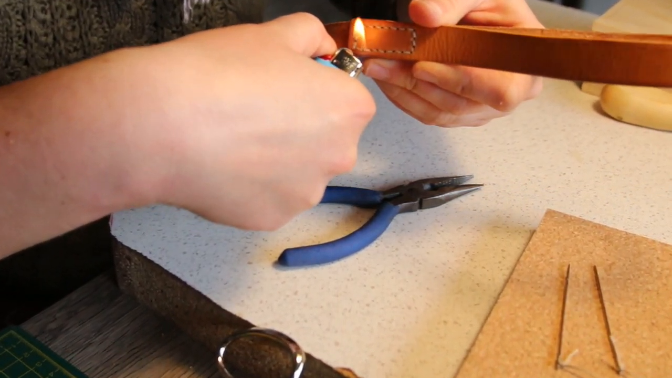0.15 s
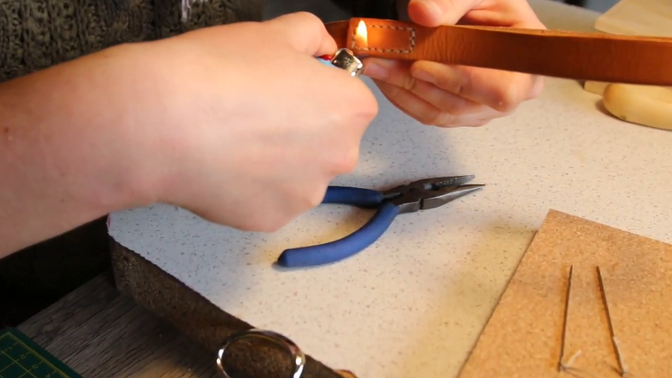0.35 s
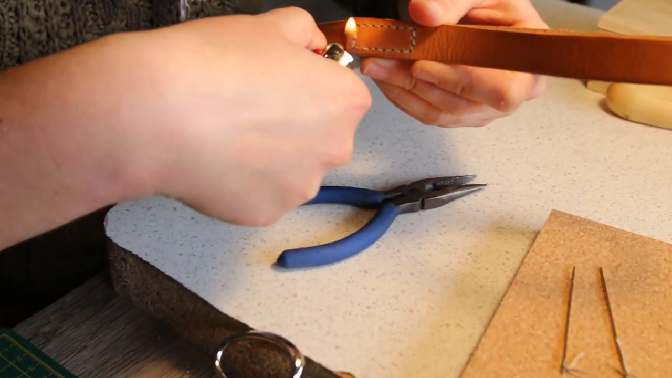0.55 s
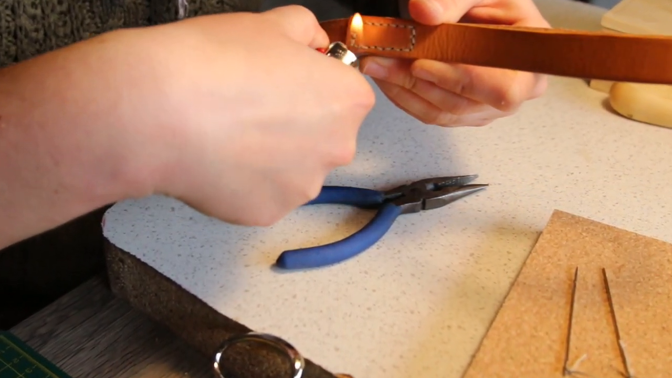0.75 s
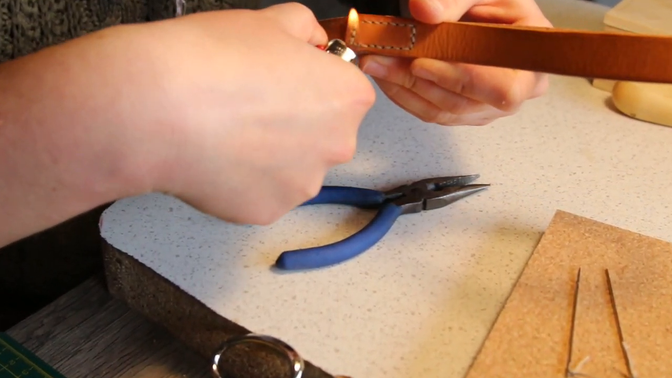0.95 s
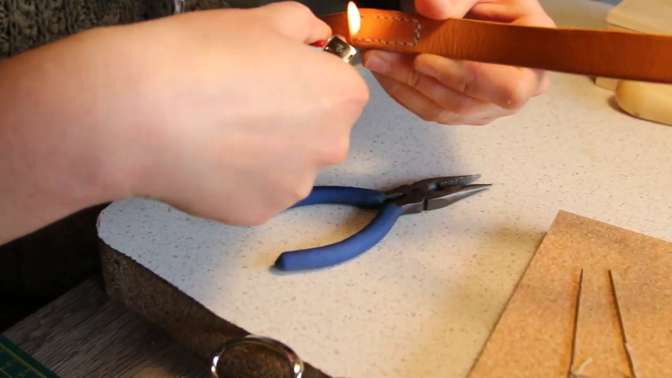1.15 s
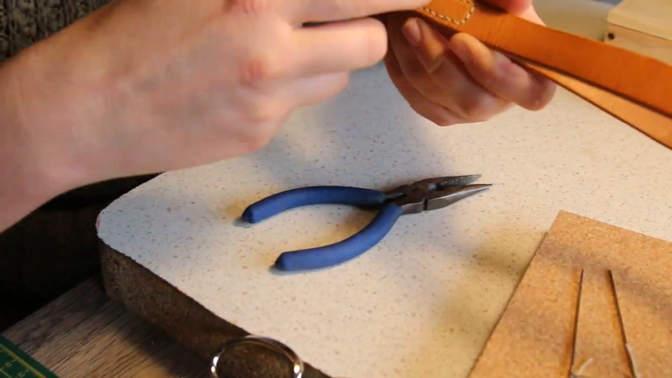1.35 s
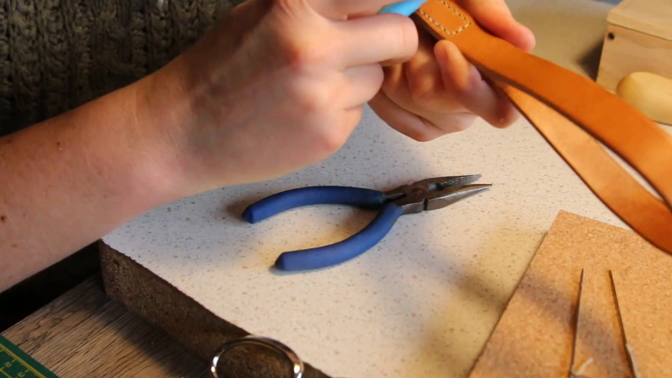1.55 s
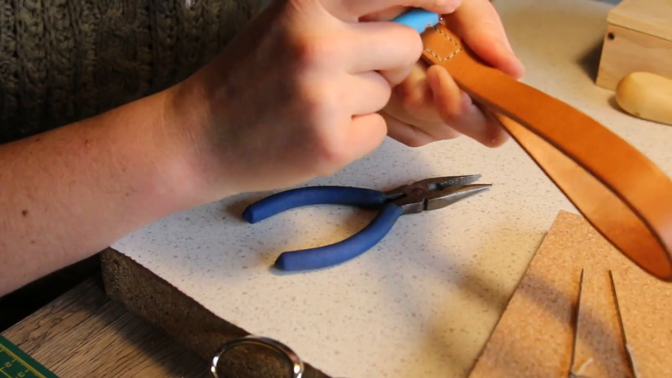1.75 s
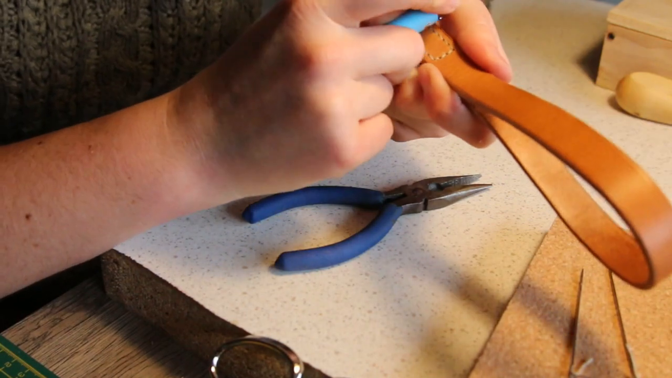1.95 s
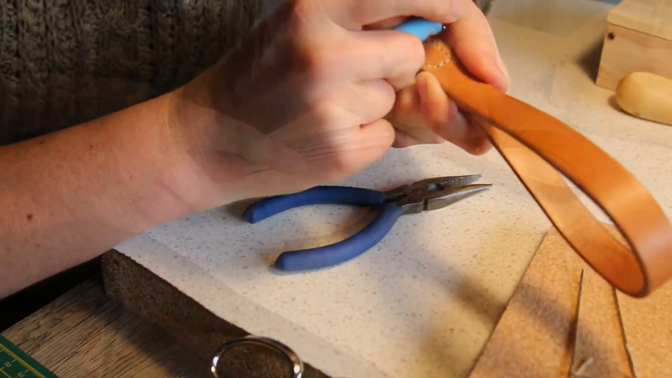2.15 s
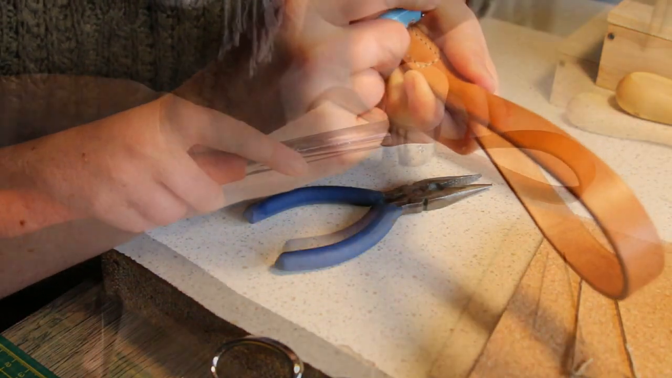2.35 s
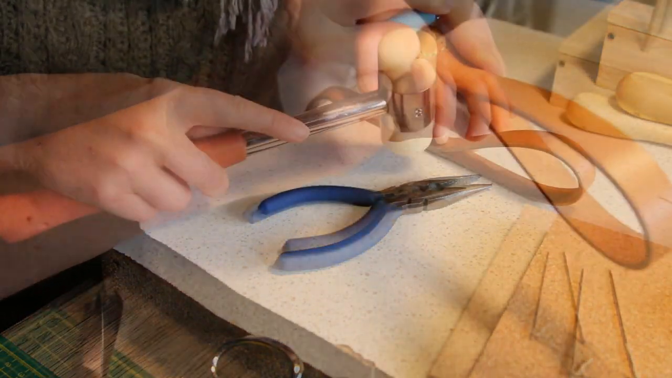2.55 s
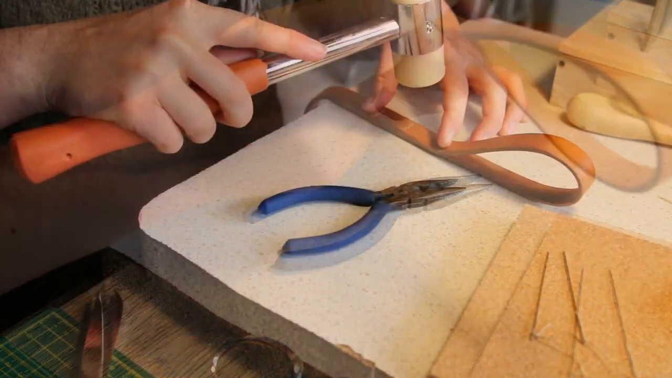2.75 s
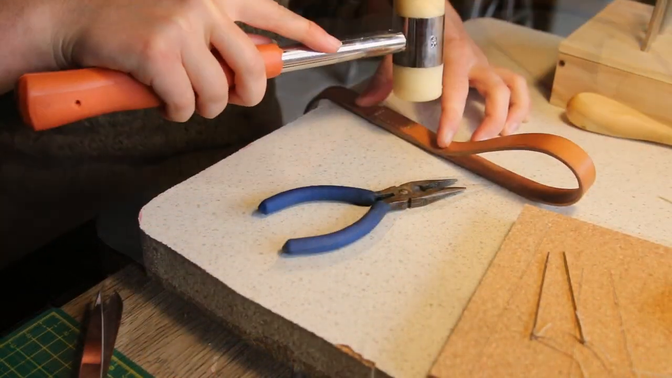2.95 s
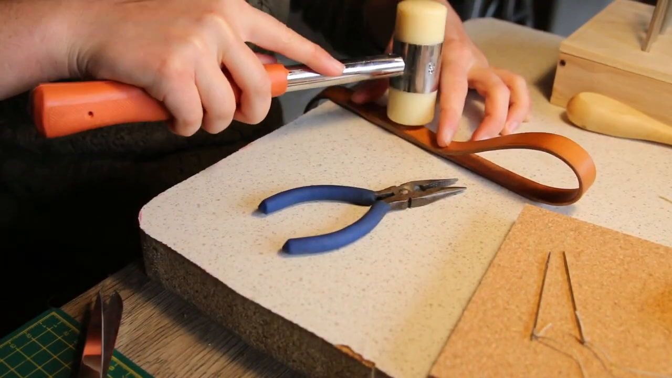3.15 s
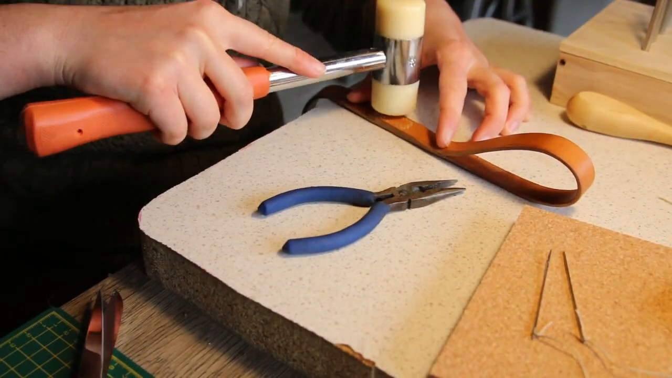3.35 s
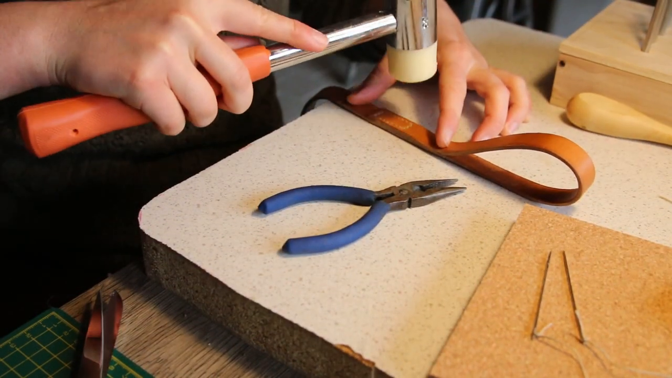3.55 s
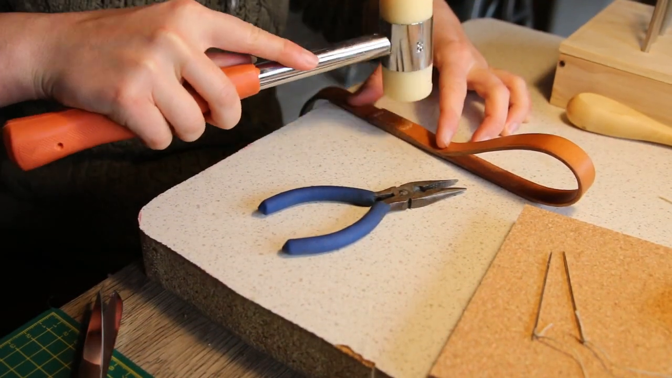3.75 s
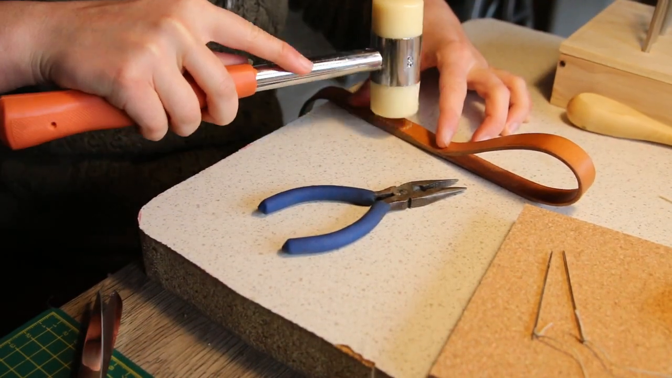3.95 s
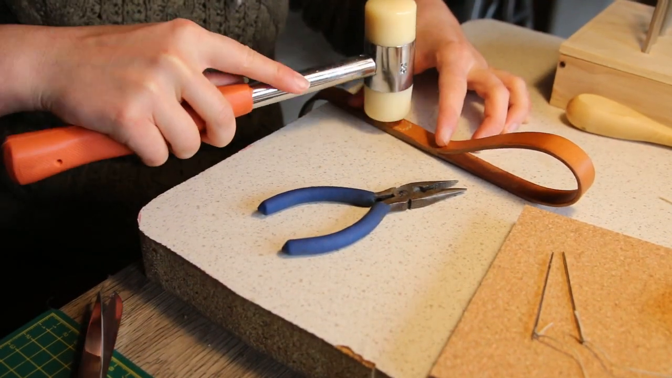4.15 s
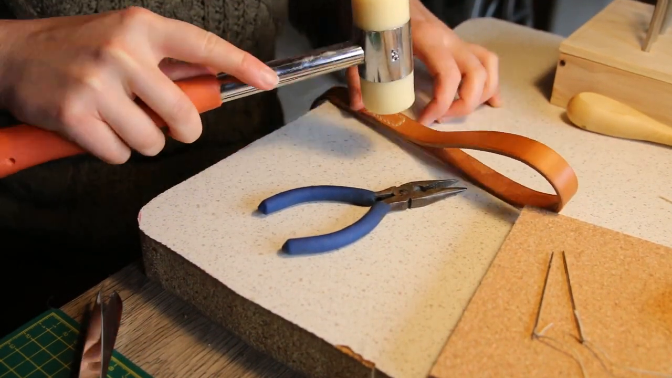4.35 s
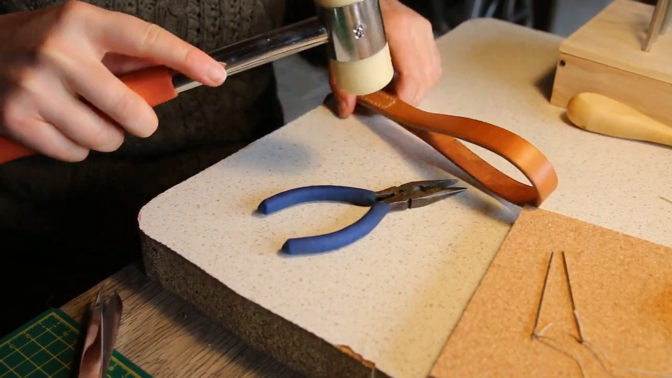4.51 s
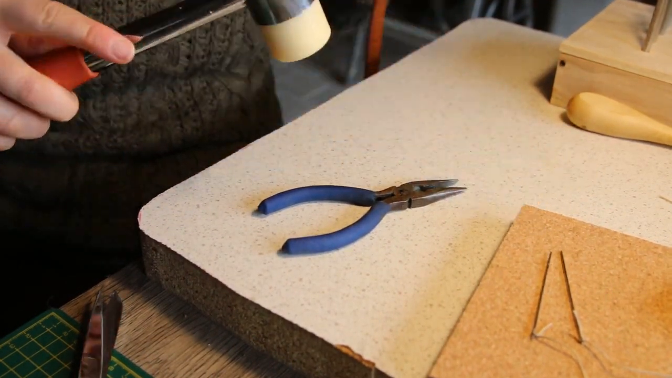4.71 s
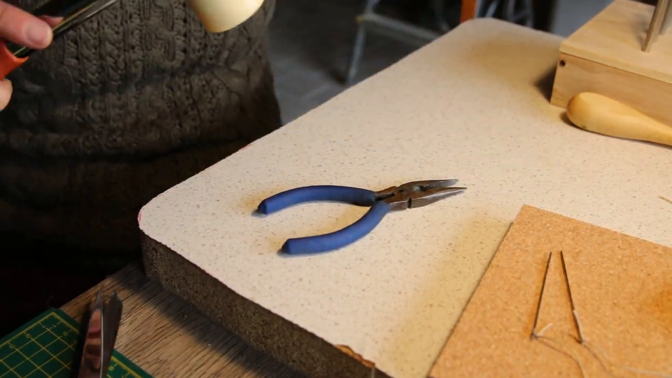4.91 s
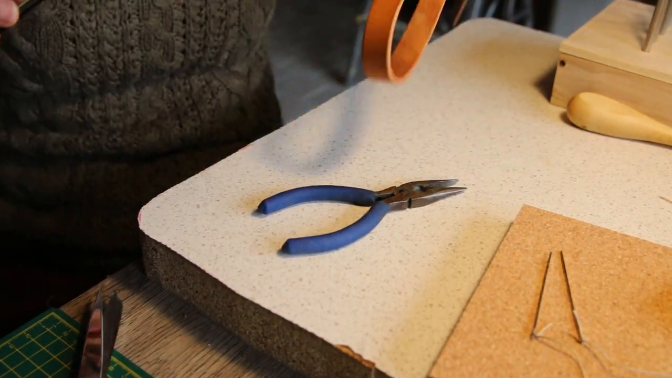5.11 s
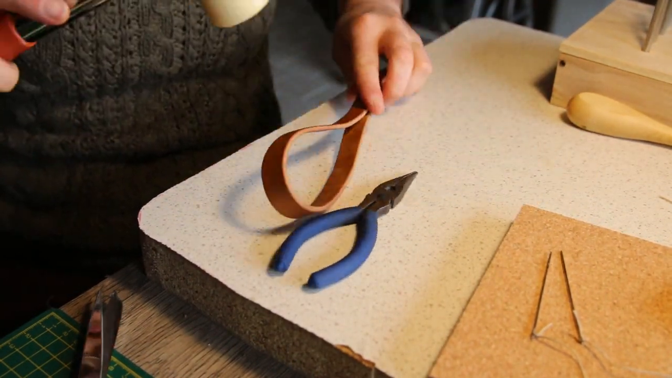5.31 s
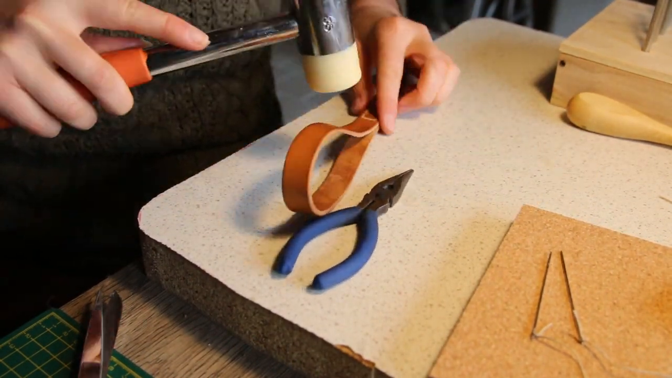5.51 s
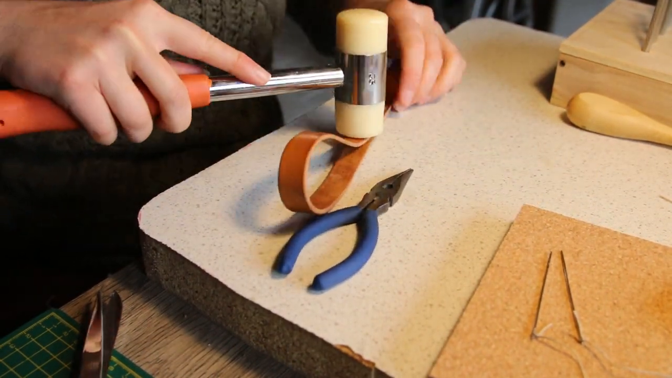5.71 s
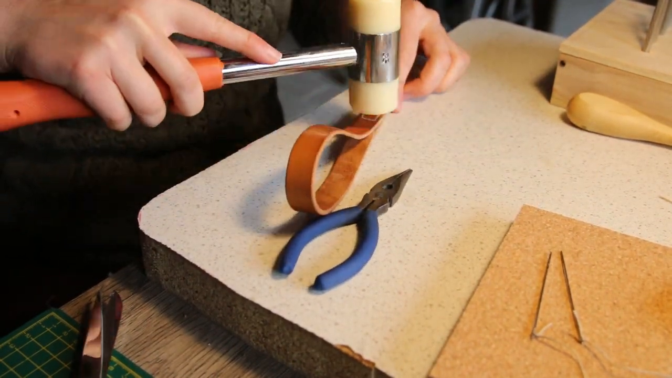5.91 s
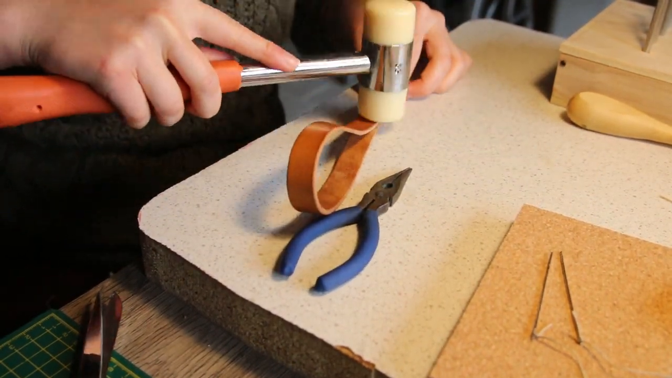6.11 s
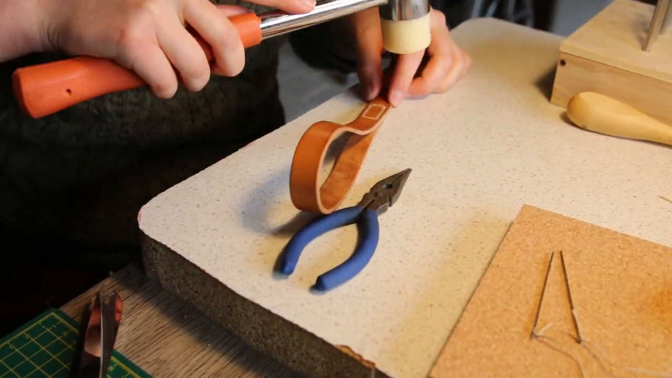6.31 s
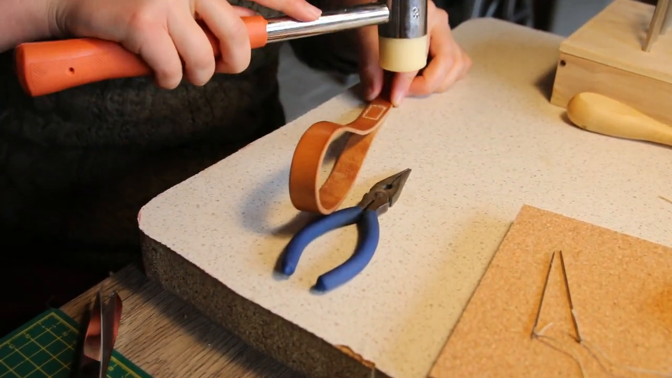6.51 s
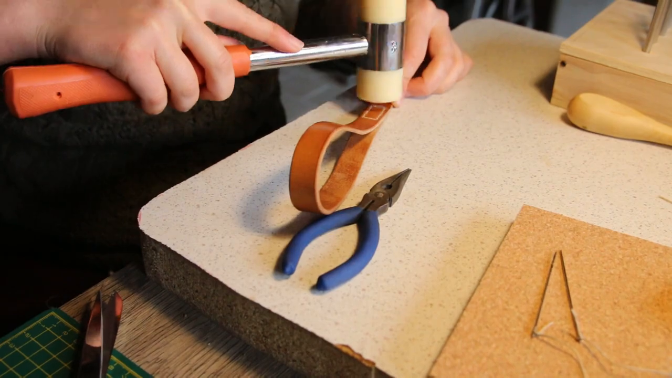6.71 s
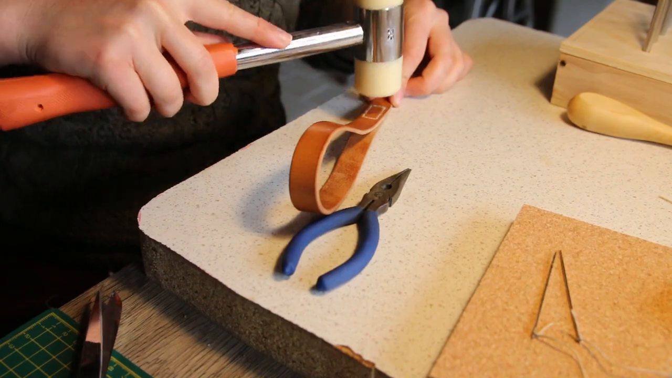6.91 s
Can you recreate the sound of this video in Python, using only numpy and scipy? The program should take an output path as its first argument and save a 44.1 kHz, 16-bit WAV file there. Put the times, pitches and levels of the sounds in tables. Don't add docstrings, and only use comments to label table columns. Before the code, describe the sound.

A small, fairly live workshop heard close up in stereo. At first there is only soft hiss and faint distant vehicle rumble. Around 1.2 s a lighter clicks lightly, followed by leather rubbing and dull little knocks to 1.5 s; more tiny clicks come at 2.25 s. The hiss fades lower by 3 s, with a light bench knock at 2.8. A slightly softer mallet blow lands at 2.9, then five firm ones about every quarter second until 4.2: short, hard knocks on leather over stone, loose tools rattling, a faint hum lingering. Quiet sleeve rustles follow. At 5.2-5.4 the strap slaps, flops and clacks against pliers. A lower, cushioned thump at 5.8 precedes hard blows at 6.2, 6.5 and 6.75. Every blow is slightly clipped and ducked, the room swelling up behind it.

```python
import sys
import numpy as np
from scipy import signal
from scipy.fft import rfft, irfft
from scipy.io import wavfile
from scipy.ndimage import uniform_filter1d

SR = 44100
rng = np.random.default_rng(int(sys.argv[2]) if len(sys.argv) > 2 else 0)


def unload_audio(sound):
    columns = np.transpose(np.atleast_2d(sound))
    steps = np.round(np.clip(columns, -1, 1) * 32767)
    wavfile.write(sys.argv[1], SR, steps.astype(np.int16))


def level_to_linear(level):
    exponent = np.asarray(level, float) / 20
    return 10 ** exponent


N = 307377
TAIL = 2 * SR // 3

# start in seconds, room answer in dB, hardness as a pitch factor of the block.
BLOWS = [
    (2.9286, -4.5, .91),
    (3.1835, 0, 1),
    (3.4347, 0, 1),
    (3.6962, 0, 1),
    (3.9491, 0, 1),
    (4.2102, 0, 1),
    (6.1844, 0, 1),
    (6.4812, 0, 1),
    (6.7601, 0, 1),
]
# start in seconds, strength in dB, room answer in dB, hardness as a pitch factor.
CUSHIONED_BLOW = (5.8003, -2, -8.5, 1)
# frequency in Hz, side minus mid in dB.
HISS_WIDTH = [(60, -8), (110, -4.5), (200, -1), (380, -0.5), (700, -2.5), (1290, 0), (2380, 0.5),
              (4400, -0.5), (8120, 0), (15000, 1)]
# frequency in Hz, side minus mid in dB.
ROOM_WIDTH = [(60, -17), (110, -32), (200, -21.5), (380, -21), (700, -15.5), (1290, -8), (2380, -6.5),
              (4400, 4), (8120, 1), (15000, 5)]


def unit(x):
    return x / np.sqrt(np.mean(x ** 2) + 1e-20)


def along(points, hz):
    f, v = np.transpose(points)
    return np.interp(np.log(hz + 1), np.log(f + 1), v)


def bump(hz, centre_hz, width_hz):
    detuning = (hz * hz - centre_hz ** 2) / (width_hz * (hz + 1))
    return 1 / np.sqrt(1 + detuning ** 2)


def noise(size, gain, side):
    hz = np.fft.rfftfreq(size, 1 / SR)
    turn = np.arctan(level_to_linear(along(side, hz)))
    spectra = rfft(rng.standard_normal((2, size))) * gain(hz)
    mid, diff = irfft(spectra * [np.cos(turn), np.sin(turn)], size)
    left = np.roll(mid + diff, 2)
    return unit(np.array([left, mid - diff]))


def dying(x, build_s, patchy_db=1.26):
    # frequency in Hz, time to fall 60 dB in seconds.
    room_t60 = [(60, 0.56), (200, 0.4), (1000, 0.57), (4000, 0.54), (8000, 0.43), (15000, 0.25)]
    hz, t, z = signal.stft(x, SR, nperseg=256)
    patch = rng.standard_normal(z.shape[1:])
    patch = uniform_filter1d(patch, size=4, axis=0)
    patch = unit(uniform_filter1d(patch, size=6, axis=1))
    fall_db = 60 * t / along(room_t60, hz)[:, None]
    tail = signal.istft(z * level_to_linear(patchy_db * patch - fall_db), SR, nperseg=256)[1][:, :TAIL]
    return tail * (1 - np.exp(-np.arange(TAIL) / SR / build_s))


def add(out, s, x):
    out[:, round(s * SR):][:, :x.shape[-1]] += x


def apart(x, count=3):
    return np.array([np.roll(x, count), x])


def hiss():
    # frequency in Hz, level in dB per Hz.
    first_colour = [(15, -44.5), (25, -13), (43, -25), (64, -8), (82, -11), (117, -7), (217, -7.5),
                    (242, -6), (373, -7.5), (531, -10.5), (695, -10.5), (9570, -18.5), (16000, -22.5)]
    # frequency in Hz, level in dB per Hz.
    second_colour = [(15, -56), (25, -36), (166, -10), (405, -21), (451, -6.5), (545, -19), (607, -14),
                     (1230, -18), (1700, -24), (8360, -25.5), (16000, -30)]
    fade_from_s, fade_to_s = 2.3, 3.02
    t = np.arange(N) / SR
    fade = np.clip((fade_to_s - t) / (fade_to_s - fade_from_s), 0, 1)
    first = level_to_linear(-59) * fade * noise(N, lambda hz: level_to_linear(along(first_colour, hz)), HISS_WIDTH)
    second = level_to_linear(-75.0) * noise(N, lambda hz: level_to_linear(along(second_colour, hz)), HISS_WIDTH)
    return first + second


def rumble():
    # nearest moment in seconds, level in dB, passing time in seconds.
    vehicles = [
        (.3, -67, 0.23),
        (.8, -69, 0.18),
        (1.3, -70, 0.19),
    ]
    shudder_db, shudder_t60 = -55, 0.68
    t = np.arange(N) / SR
    low = sum(level_to_linear(db) * np.exp(-((t - s) / pass_s) ** 2) for s, db, pass_s in vehicles)
    for s, *_ in BLOWS + [CUSHIONED_BLOW]:
        low += (t > s) * level_to_linear(shudder_db - 60 * np.abs(t - s) / shudder_t60)
    return level_to_linear(-2.5) * low * noise(N, lambda hz: bump(hz, 80, 21) ** 2, HISS_WIDTH)


def ticks(table, width, t60, thud_db, fizz_db):
    out, t = np.zeros((2, N + TAIL)), np.arange(TAIL) / SR
    echo_s = .003
    rise = 1 - np.exp(-t / .0003)
    for s, db, ring_hz, room_db in table:
        def colour(hz):
            ring = bump(hz, ring_hz, width * ring_hz) ** 2
            thud = bump(hz, 180, 500) ** 3 * hz ** 2 / (hz ** 2 + 130 ** 2)
            fizz = bump(hz, 7900, 3600) ** 2
            return ring + level_to_linear(thud_db + 24) * thud + level_to_linear(fizz_db + 4.0) * fizz

        touch = noise(TAIL, colour, ROOM_WIDTH)
        ringing = touch[0] + 0.7 * np.sin(2 * np.pi * ring_hz * t)
        direct = rise * level_to_linear(-60 * t / t60) * ringing
        direct *= level_to_linear(4) / np.abs(direct).max()
        size = np.sqrt(1 + level_to_linear(2 * thud_db))
        add(out, s, level_to_linear(db) * size * apart(direct, count=1))
        answer = dying(touch[:, ::-1], build_s=0.0013)
        add(out, s + echo_s, level_to_linear(db + room_db - 14) * size * answer)
    return out[:, :N]


def handling():
    # start in seconds, peak in dB, ring in Hz, room in dB.
    lighter = [(1.2146, -48, 3370, -4), (1.2274, -49, 3280, -5), (1.2775, -44, 3470, -2.5),
               (2.2498, -47.5, 3640, -10), (2.2505, -50.5, 2250, -2), (2.2644, -52, 2200, -10)]
    # seconds, dB, Hz, dB.
    snaps = [(1.3558, -56, 6340, -11), (1.4067, -52, 6500, -14), (2.9356, -33.5, 6200, -29),
             (5.2451, -39.5, 3150, -14), (5.2525, -56, 6000, -10), (5.2865, -35, 12000, -17),
             (5.2881, -44, 7560, -6), (5.3378, -51, 8400, -7), (5.3594, -53, 9000, -10),
             (5.4071, -59, 4830, -21), (5.8072, -42, 6200, -25), (5.8124, -49, 4530, -22)]
    # seconds, dB, Hz, dB.
    slaps = [(1.4185, -40.5, 2310, 6.5), (5.2094, -38.5, 2940, 1)]
    # seconds, dB, Hz, dB.
    knocks = [(1.42, -40.5, 610, 3), (1.4345, -40.5, 810, 6), (1.446, -43, 607, -16), (1.502, -53, 860, 2),
              (4.298, -24.5, 574, 5), (5.285, -50.5, 980, 8.5)]
    # seconds, dB, Hz, dB.
    grazes = [(2.9283, -33, 2520, -20), (5.7795, -62.5, 2600, 10), (5.804, -41, 1950, -14),
              (6.1818, -38, 2550, -20), (6.9, -47, 2440, -22)]
    # seconds, dB, Hz, dB.
    flops = [(5.221, -45.5, 870, 2), (5.245, -38.5, 1130, 2), (5.701, -50.5, 624, 7.5)]
    # seconds, dB, Hz, dB.
    clack = [
        (5.4072, -38.5, 2500, 0.99),
    ]
    return (ticks(lighter, width=.2, t60=.016, thud_db=-40, fizz_db=-17)
            + ticks(snaps, width=.7, t60=.009, thud_db=-40, fizz_db=-10)
            + ticks(slaps, width=.8, t60=.011, thud_db=-14, fizz_db=-36)
            + ticks(knocks, width=1.0, t60=0.022, thud_db=-32, fizz_db=-34.5)
            + ticks(grazes, width=1.0, t60=0.038, thud_db=-37, fizz_db=-30)
            + ticks(flops, width=0.49, t60=0.026, thud_db=-14.0, fizz_db=-32)
            + ticks(clack, width=.78, t60=.012, thud_db=-25, fizz_db=-38))


def rubbing():
    # arrival in seconds, body in dB, fizz in dB, approach in seconds, hold in seconds.
    strokes = [(1.352, -50.5, -64, .2, 0.034), (1.427, -50.5, -72, .04, 0.022),
               (2.233, -62, -61, .05, 0.024), (4.578, -65, -79, .05, .03), (4.656, -62, -71, .1, 0.032),
               (4.79, -67, -84, 0.43, 0.046), (4.967, -66, -72, .05, 0.062),
               (5.255, -52.5, -64, .02, 0.016), (5.295, -60, -59, .01, 0.013),
               (5.72, -62.5, -90, 0.044, .03)]
    swell_from_db, body_fall, fizz_fall = 27.5, 77, 204
    grain = level_to_linear(1.6 * unit(uniform_filter1d(rng.standard_normal(N), size=200)))
    body = unit(grain * noise(N, lambda hz: bump(hz, 320, 1560) ** 2, ROOM_WIDTH))
    fizz = unit(grain * noise(N, lambda hz: bump(hz, 2900, 8100) ** 2, ROOM_WIDTH))
    s, body_db, fizz_db, approach_s, hold_s = np.transpose(strokes)[:, :, None]
    since = np.arange(N) / SR - s
    swell_db = swell_from_db * np.minimum(since, 0) / approach_s
    released_s = np.maximum(since - hold_s, 0)
    body_level = level_to_linear((body_db - 5 + swell_db - body_fall * released_s).max(axis=0))
    fizz_level = level_to_linear((fizz_db + swell_db - fizz_fall * released_s).max(axis=0))
    return body_level * body + fizz_level * fizz


def nudge():
    # frequency in Hz, level in dB, time to fall 60 dB in seconds.
    rings = [(170, -0.5, 0.64), (440, -9.5, 0.89), (1110, -7.5, 0.41), (2270, -13.5, 1), (3660, -25, 0.091),
             (7235, -32, .5), (8350, -20, 0.83)]
    start_s, level_db = 2.794, -55.5
    out, t = np.zeros((2, N + TAIL)), np.arange(TAIL) / SR
    for hz, db, t60 in rings:
        high = hz > 300
        ring = noise(TAIL, lambda f: bump(f, hz, 0.23 * hz * high + 22) ** 2, ROOM_WIDTH)
        knock = (1 - np.exp(-t / 0.00069)) * (1 + 2.9 * high * np.exp(-t / 0.008))
        add(out, start_s, level_to_linear(level_db + db - 60 * t / t60) * knock * ring)
    return out[:, :N]


def rung(modes, hard):
    t = np.arange(TAIL) / SR
    ring = np.zeros(TAIL)
    for hz, size, t60 in modes:
        fall = level_to_linear(rng.normal(0, 1.0) - 60 * t / t60)
        ring += size * fall * np.sin(2 * np.pi * hz * hard * t)
    return ring * (1 - np.exp(-t / .003))


def mallet():
    # frequency in Hz, signed amplitude, time to fall 60 dB in seconds.
    block = [(178, .027, .13), (241, .24, .042), (301, .12, .075), (327, .055, .16), (427, .37, .026),
             (514.7, -.7, .024), (519.7, .4, .04), (619, .018, .15), (782, .067, .036), (1103, .01, .145)]
    # frequency in Hz, level in dB per Hz.
    room_colour = [(35, -60), (60, -17), (96, -15.5), (130, -3.5), (268, -1.5), (338, 1), (458, -7.5),
                   (553, -0.5), (666, -7), (1040, -5.5), (4970, -29), (5860, -27), (16000, -35.5)]
    # frequency
    # in Hz, width in Hz, dB above the room.
    resonances = [(3760, 810, 0), (6010, 32, 13), (5760, 33, 8), (6110, 29, -11), (9400, 230, -4), (784, 15, 4),
                  (1005, 10, -9), (1178, 8.4, -30), (161, 21, 1), (239, 25, -7.5), (312, 8.3, 7), (467, 7.3, 13),
                  (525, 13, -8), (623, 8, -3.5)]
    lead_s = 0.00043
    out, t = np.zeros((2, N + TAIL)), np.arange(TAIL) / SR

    def jolted(hz):
        rattle = sum(level_to_linear(db) * bump(hz, centre, width) for centre, width, db in resonances)
        return level_to_linear(along(room_colour, hz)) * (1 + rattle)

    walls = noise(TAIL, jolted, ROOM_WIDTH)
    crack_level = level_to_linear(-29.5 - 60 * t / 0.0053) * (1 - np.exp(-t / 0.00038))
    for s, room_db, hard in BLOWS:
        crack = crack_level * noise(TAIL, lambda hz: bump(hz, 3700, 13500) ** 2, ROOM_WIDTH[:7])
        fresh = noise(TAIL, jolted, ROOM_WIDTH)
        answer = level_to_linear(room_db - 22.0) * dying(0.56 * walls + fresh, build_s=0.0085)
        add(out, s - lead_s, crack)
        add(out, s, apart(rung(block, hard)) + answer)
    return out[:, :N]


def bench():
    # frequency in Hz, level in dB, time to fall 60 dB in seconds.
    objects = [(471, -61.5, 3.2), (550, -67, 12), (151.5, -47, 1.16), (64.6, -78, 8.4)]
    t = np.arange(N) / SR
    kicks = [(s, 0) for s, *_ in BLOWS]
    kicks += [(0, -150), (CUSHIONED_BLOW[0], -14)]
    starts, kick_db = np.transpose(sorted(kicks))
    last = np.searchsorted(starts, t, "right") - 1
    since = t - starts[last]
    return sum(level_to_linear(db + kick_db[last] - 60 * since / t60) * np.sin(2 * np.pi * hz * since)
               for hz, db, t60 in objects)


def cushioned():
    # frequency in Hz, signed amplitude, time to fall 60 dB in seconds.
    padded_block = [(121, -.068, .028), (158, .075, .094), (235, .105, .046), (270, -.113, .042),
                    (363, .016, .15), (447, .02, .12), (597, -.007, .15), (150, .007, .55), (248, .007, .3),
                    (1700, .002, .12)]
    # frequency in Hz, level in dB per Hz.
    muffled = [(35, -46), (60, -13), (91, -15), (168, -4.5), (294, -10), (330, -9.5), (469, -15),
               (566, -18.5), (1550, -29.5), (4120, -39), (16000, -51)]
    out, t = np.zeros((2, N + TAIL)), np.arange(TAIL) / SR
    s, db, room_db, hard = CUSHIONED_BLOW
    walls = noise(TAIL, lambda hz: level_to_linear(along(muffled, hz)), ROOM_WIDTH)
    answer = level_to_linear(room_db - 22) * dying(walls, build_s=0.005)
    add(out, s, level_to_linear(db) * (apart(rung(padded_block, hard)) + answer * level_to_linear(-60 * t / 3.1)))
    return out[:, :N]


def scene():
    quiet = hiss() + rumble() + handling() + rubbing()
    blows = nudge() + mallet() + bench() + cushioned()
    return (quiet + blows) * level_to_linear([[-.2], [.2]])


def top_cut(x):
    return signal.sosfilt(signal.butter(12, 16490, fs=SR, output="sos"), x)


def record(dry):
    climb_db = 170 * np.arange(N) / SR
    level_db = 20 * np.log10(np.abs(dry).max(0) + 1e-9)
    over_db = np.maximum(level_db + 27, 0)
    duck_db = np.maximum.accumulate(over_db + climb_db) - climb_db
    lag = np.exp(-1 / (SR * .009))
    x = dry * level_to_linear(-signal.lfilter([1 - lag], [1, -lag], duck_db))
    x = x / (1 + np.abs(x / .0635) ** 8) ** (1 / 8)
    hz = np.fft.rfftfreq(N, 1 / SR)
    droop = level_to_linear(-2.5 * (hz / 13000) ** 2)
    x = irfft(rfft(x) * (hz < 16000) * droop, N)
    return top_cut(x)


dry = scene()
out = record(dry)
unload_audio(out)
```